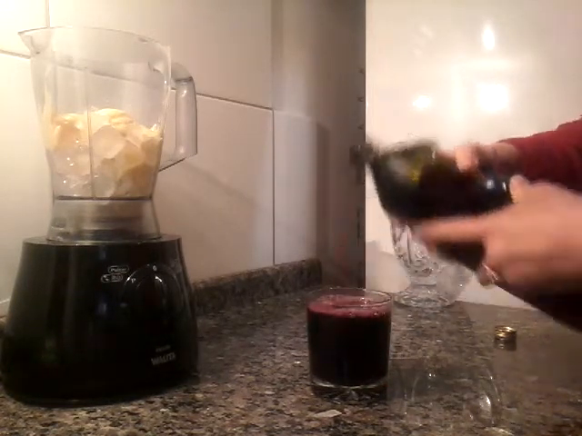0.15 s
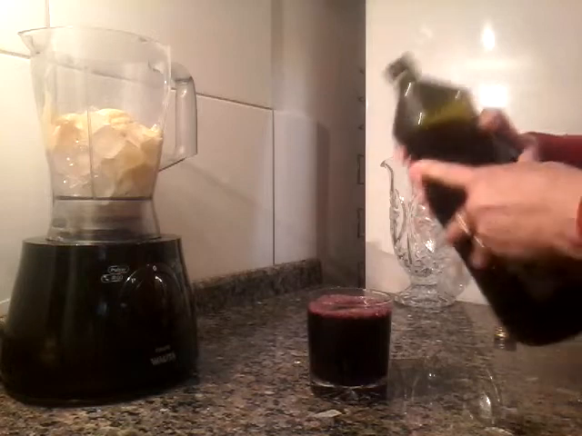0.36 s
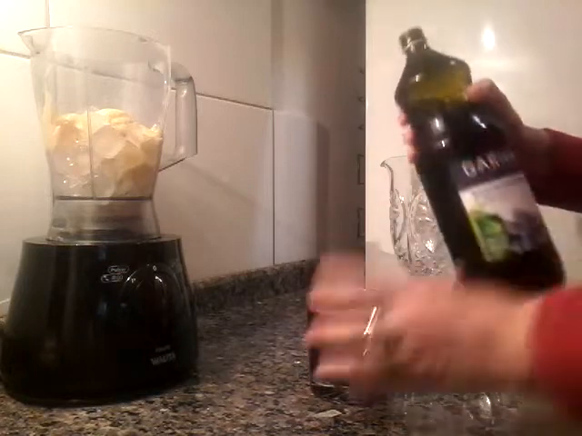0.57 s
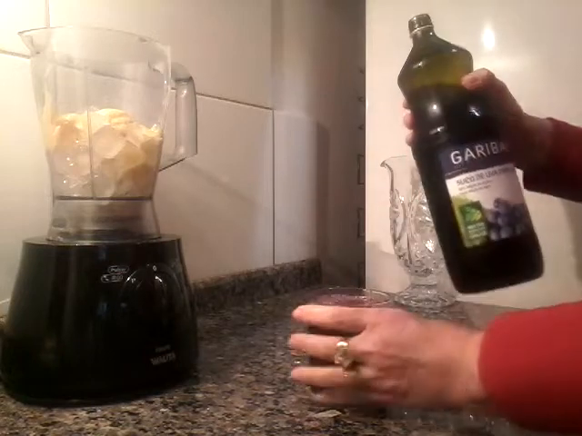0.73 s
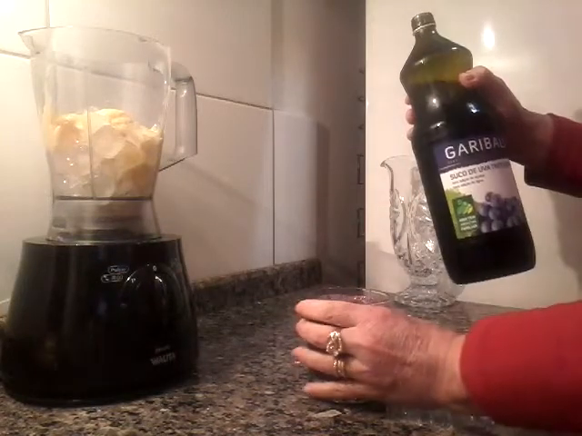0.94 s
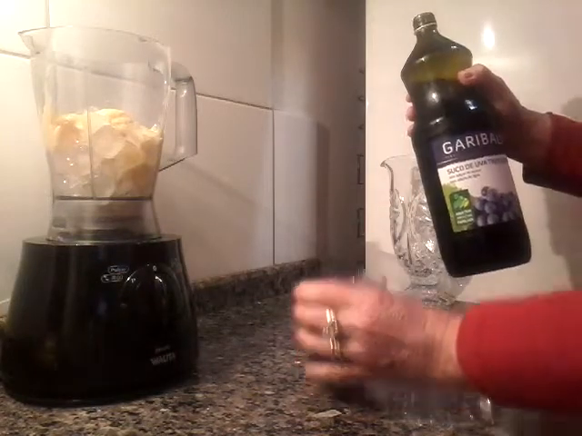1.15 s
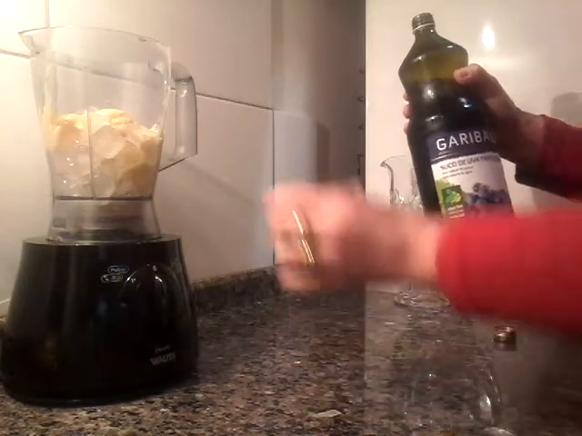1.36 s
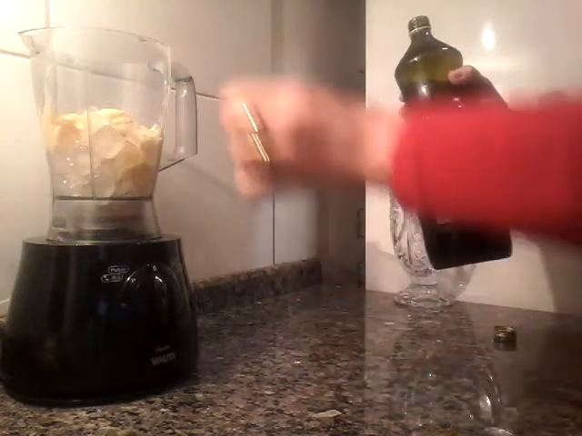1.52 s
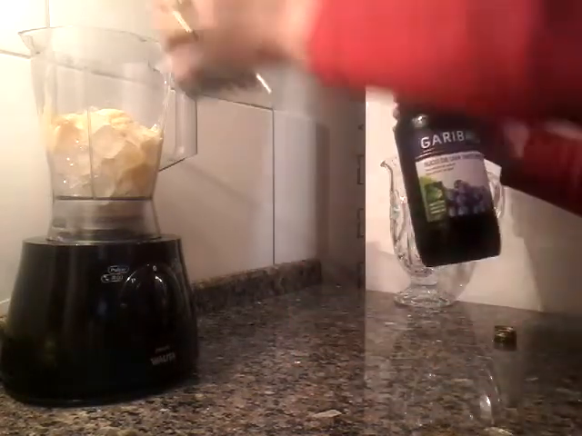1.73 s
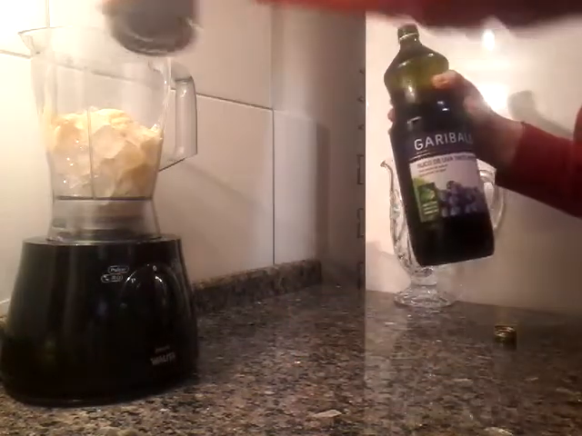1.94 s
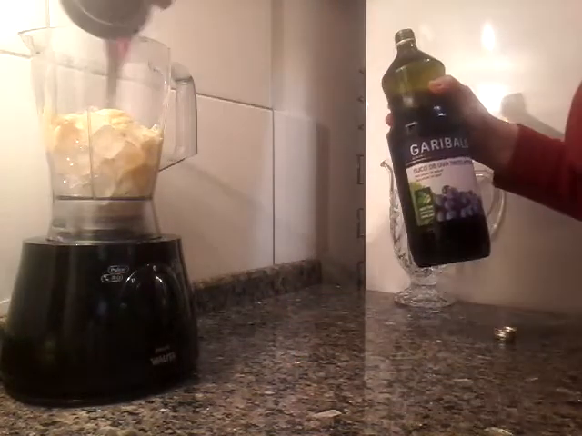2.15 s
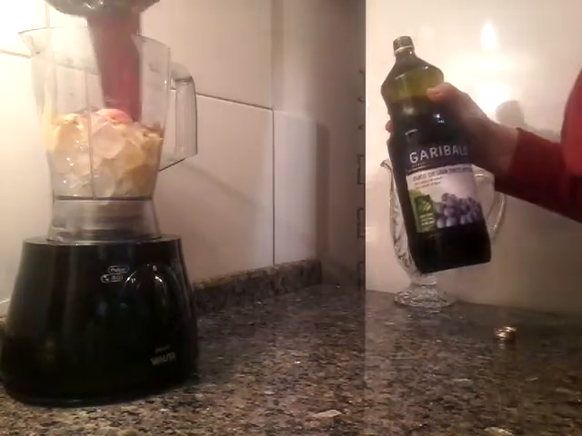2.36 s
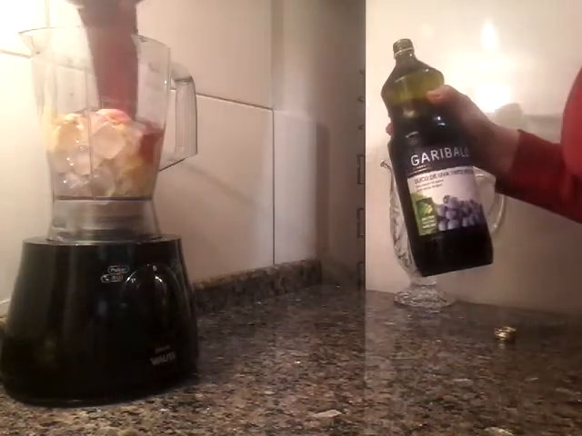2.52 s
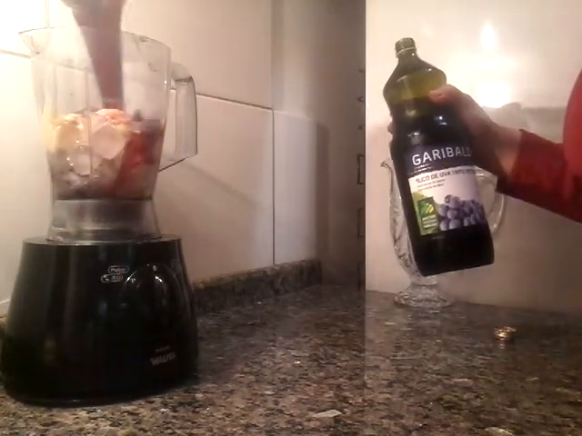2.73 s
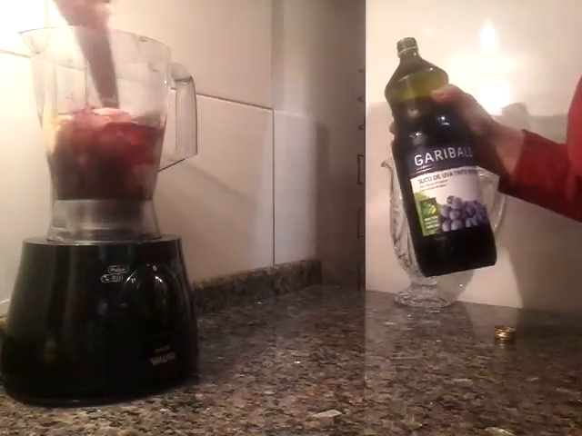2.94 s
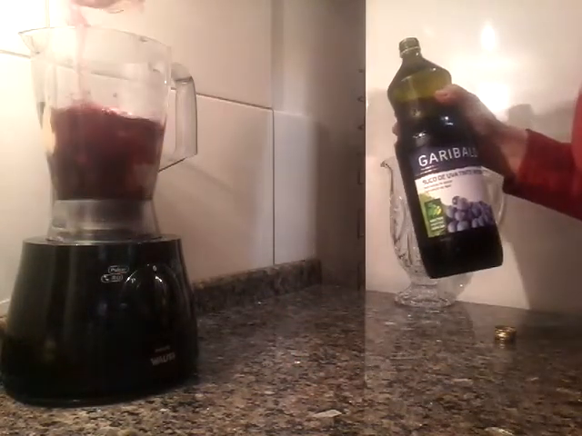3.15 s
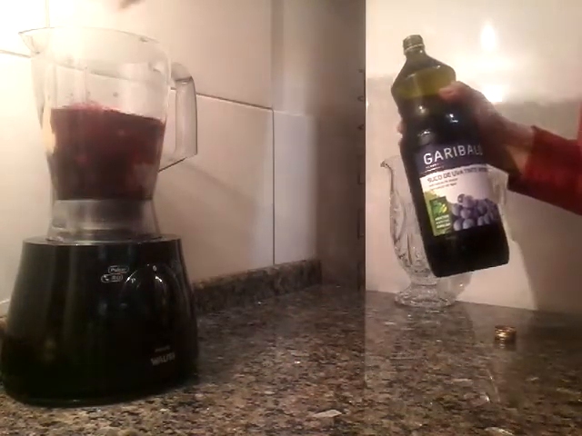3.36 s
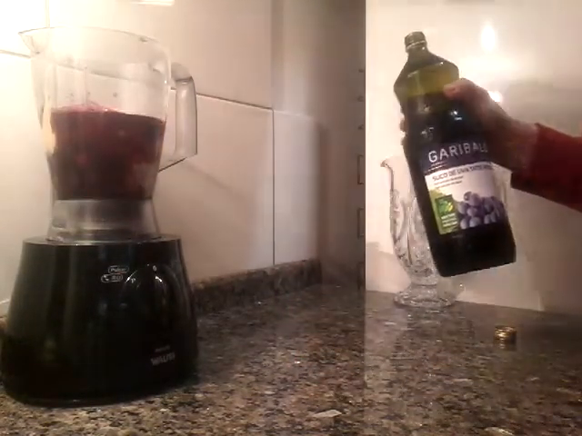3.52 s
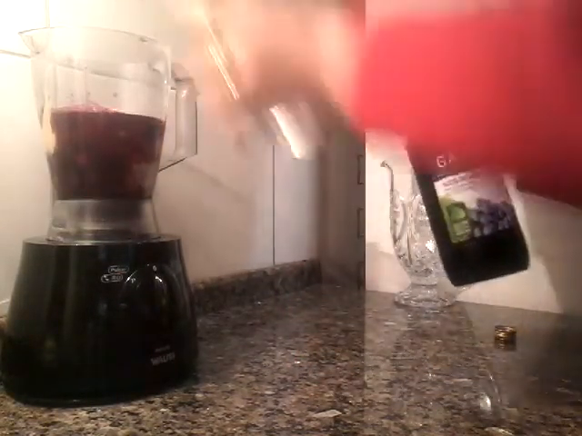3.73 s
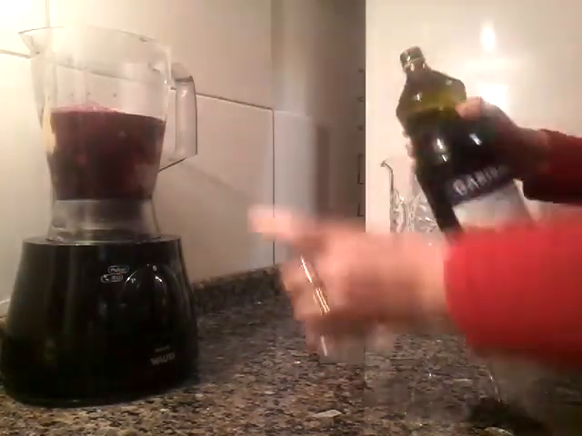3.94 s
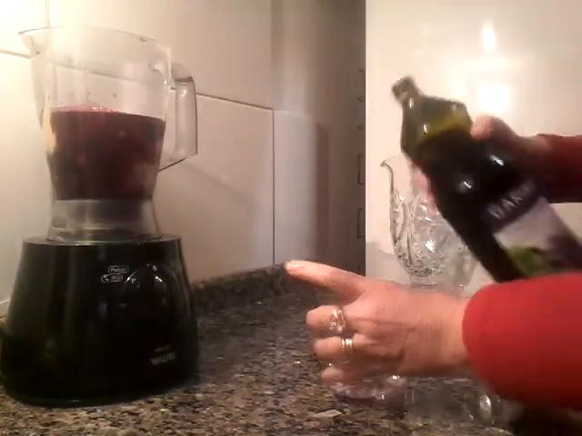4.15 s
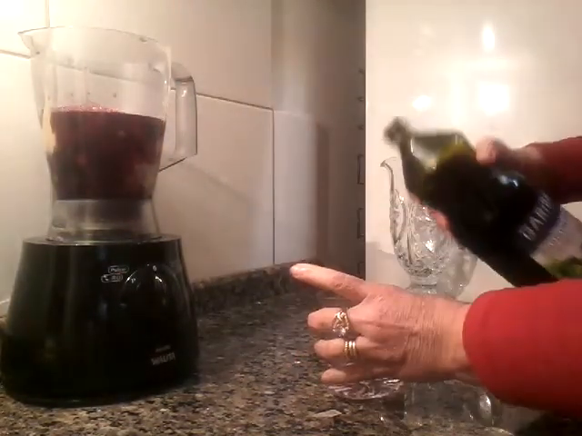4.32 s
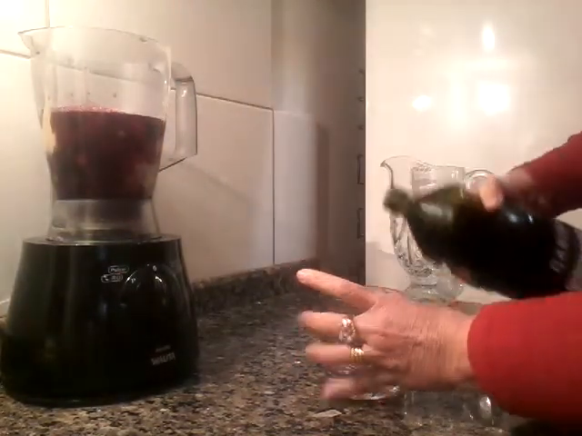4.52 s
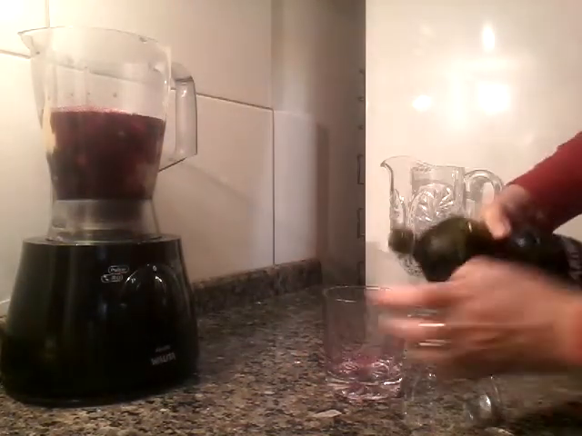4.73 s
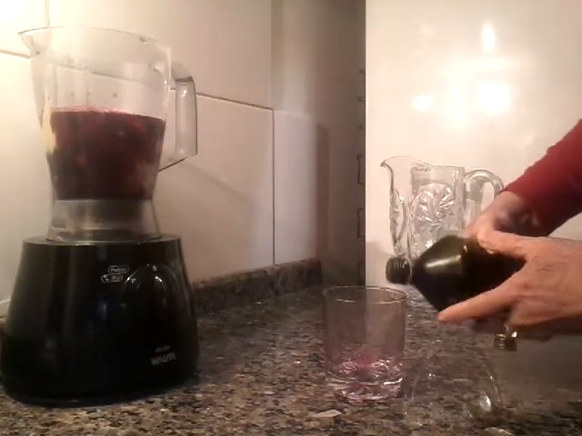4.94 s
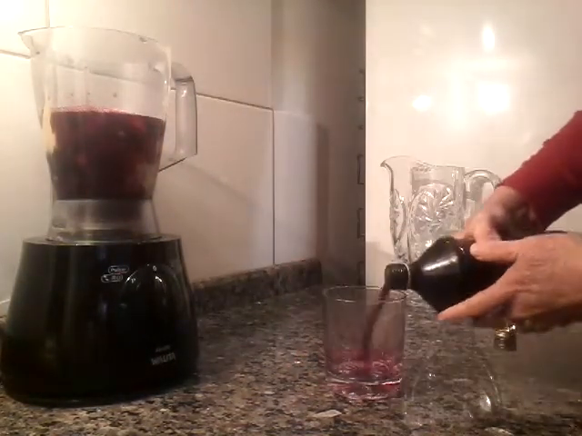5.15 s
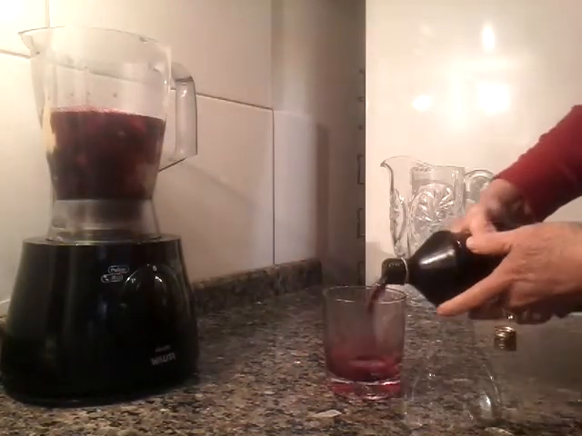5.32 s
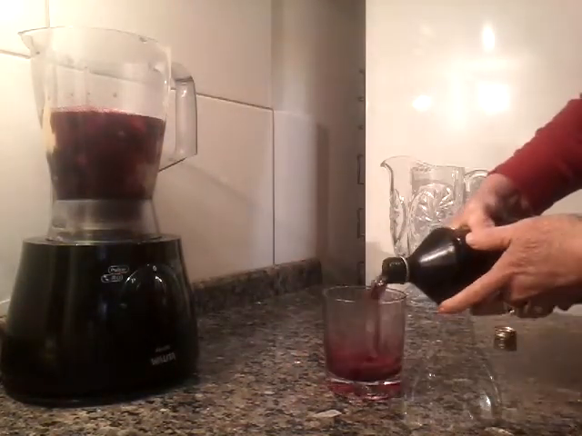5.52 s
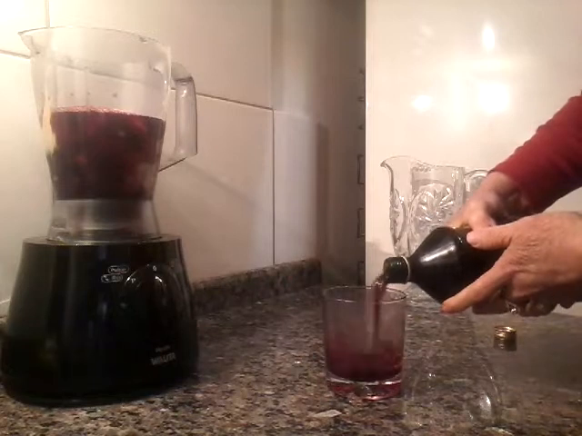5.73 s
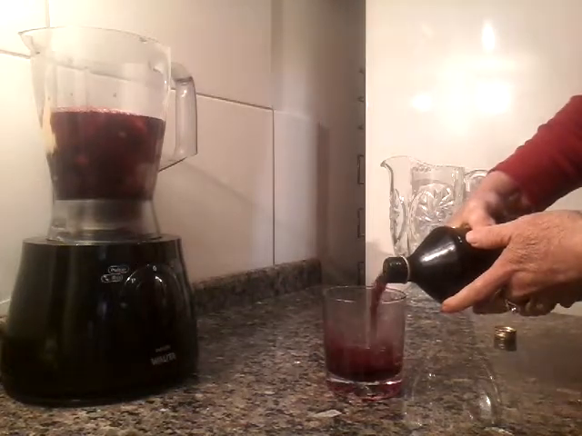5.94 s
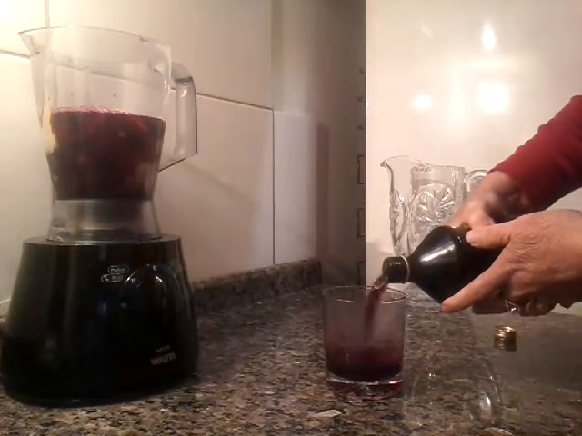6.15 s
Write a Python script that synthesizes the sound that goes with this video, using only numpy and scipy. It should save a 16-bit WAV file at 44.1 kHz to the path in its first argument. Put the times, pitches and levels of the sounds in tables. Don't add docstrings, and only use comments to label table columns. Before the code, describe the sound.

Last drops spatter into a full glass, juice gushes into a blender jar, then the glass knocks on stone and refills in glugs.

```python
import sys
import numpy as np
from scipy import signal
from scipy.fft import rfft, irfft, next_fast_len
from scipy.io import wavfile

SR = 44100
rng = np.random.default_rng(int(sys.argv[2]) if len(sys.argv) > 2 else 0)


def unload_audio(sound):
    columns = np.transpose(np.atleast_2d(sound))
    steps = np.round(np.clip(columns, -1, 1) * 32767)
    wavfile.write(sys.argv[1], SR, steps.astype(np.int16))


def level_to_linear(level):
    exponent = np.asarray(level, float) / 20
    return 10 ** exponent


N = 272538
T = np.arange(N) / SR


def rms_one(x):
    return x / np.sqrt(np.mean(x ** 2) + 1e-20)


def gain_in_time(rows):
    s, db = np.transpose(rows)
    return level_to_linear(np.interp(T, s, db, left=-200, right=-200))


def at_hz(points, hz):
    table_hz, value = np.transpose(points)
    return np.interp(np.log(hz), np.log(table_hz), value)


def drift(rate):
    r = np.exp(-80 * np.pi * rate / SR)
    slow = signal.lfilter([1], [1, -2 * r, r * r], rng.standard_normal(N // 40 + 2002))[2000:]
    return np.interp(np.arange(N) / 40, np.arange(len(slow)), rms_one(slow))


def band(x, low_hz, high_hz):
    edges = [low_hz, min(high_hz, 0.45 * SR)]
    return signal.sosfilt(signal.butter(2, edges, "band", fs=SR, output="sos"), x)


def coloured(x, spectrum):
    hz = np.maximum(np.arange(len(x) // 2 + 1) * SR / len(x), 1)
    return rms_one(irfft(rfft(x) * level_to_linear(at_hz(spectrum, hz)), len(x)))


def add(out, s, sound):
    i = round(s * SR)
    out[i:i + len(sound)] += sound[:N - i]


def burst(hz, octaves, t60):
    t = T[:SR // 8]
    noise = rng.standard_normal(len(t)) * level_to_linear(-60 * t / t60)
    puff = band(noise, hz / 2 ** octaves, hz * 2 ** octaves)
    return puff / np.abs(puff).max()


def liquid(gain, spectrum, per_s, cycles, smooth, patchy_db):
    out, flowing = np.zeros(N), gain > 1e-8
    n = flowing.sum()
    surge = drift(17)[:n]
    sizes = level_to_linear(2.5 * np.minimum(rng.exponential(1, n), 3.5)) * rng.choice([-1, 1], n)
    sizes *= rng.random(n) < per_s * level_to_linear(3.0 * surge) / SR
    pitches = np.geomspace(spectrum[1][0], spectrum[-1][0], 30)
    dealt = rng.integers(0, 30, n)
    grains = 0
    for k, hz in enumerate(pitches):
        r, w = level_to_linear(-60 * hz / (cycles * SR)), 2 * np.pi * hz / SR
        struck = sizes * (dealt == k) + 1e-18
        rung = signal.lfilter([1, 0, -1], [1, -2 * r * np.cos(w), r * r], struck)
        grains = grains + rms_one(rung) * np.sqrt(hz) * level_to_linear(at_hz(spectrum, hz))
    rush = coloured(rng.standard_normal(next_fast_len(n)), spectrum)[:n] * level_to_linear(patchy_db * surge)
    out[flowing] = gain[flowing] * rms_one(rms_one(grains) + smooth * rush)
    return out


# time in seconds, flow level in dB.
JAR_FLOW = [
    (2.18, -81),
    (2.23, -61),
    (2.32, -41.5),
    (2.5, -45.5),
    (2.92, -43),
    (3.12, -50.5),
    (3.22, -65),
    (3.6, -74.5),
]
# time in seconds, trickle level in dB.
TRICKLE = [
    [(0.0, -71), (0.348, -74), (0.6, -87)],
    [(5.25, -69.5), (5.568, -70.5), (6.18, -63)],
]
# time in seconds, fizz level in dB.
FIZZ = [
    [(0.3, -81), (0.712, -76), (2.2, -73)],
    [(3.4, -75), (3.43, -69.5), (5.3, -63.5)],
]
# frequency in Hz, level in dB per Hz.
SPRAY_COLOUR = [(3240, -28), (5500, -7), (6150, -6), (7060, 3), (9190, 2.5), (9740, 0.5), (11900, 1),
                (15200, -2.5), (16000, -23)]
# frequency in Hz, level in dB per Hz.
SPLASH_COLOUR = [(650, -32), (1100, -15), (1280, -20), (1660, 7), (1970, -6.5), (2170, -0.5), (2370, -2),
                 (4170, -5.5), (4610, -2), (7000, -12.5), (9100, -44), (15400, -120)]
# frequency in Hz, level in dB per Hz.
CHURN_COLOUR = [(88, -78), (150, -34), (226, -17), (329, -7), (496, -13), (576, -4), (807, -5), (1400, -13),
                (1820, -42), (3080, -120)]
# frequency in Hz, level in dB per Hz.
THIN_COLOUR = [(710, 2.5), (1200, 13), (1340, -22), (1910, -69), (2230, 15), (4500, -28), (5240, 4),
               (7660, 2.5), (9610, -1), (16000, 3.5)]
SPLASH_DB, SPLASH_FADE_DB_PER_S = 1.5, 3
CHURN_DB, POOL_S, POOL_DB_PER_S = -8.5, 2.48, 60


def streams():
    spray = gain_in_time(JAR_FLOW)
    splash = spray * level_to_linear(SPLASH_DB - SPLASH_FADE_DB_PER_S * (T - JAR_FLOW[0][0]))
    churn = spray * level_to_linear(CHURN_DB + POOL_DB_PER_S * np.minimum(T - POOL_S, 0))
    trickle = sum(gain_in_time(rows) for rows in TRICKLE)
    fizz = sum(gain_in_time(rows) for rows in FIZZ)
    fine = liquid(spray, SPRAY_COLOUR, 2500, cycles=60, smooth=0.55, patchy_db=3.5)
    coarse = liquid(splash, SPLASH_COLOUR, 1500, cycles=45, smooth=0.7, patchy_db=3.5)
    thin = liquid(trickle, THIN_COLOUR, 4000, cycles=50, smooth=1.3, patchy_db=3)
    deep = liquid(churn, CHURN_COLOUR, 350, cycles=22, smooth=0.94, patchy_db=-3)
    foam = fizz * coloured(rng.standard_normal(N), SPRAY_COLOUR) * level_to_linear(2.4 * drift(23))
    mix = level_to_linear(-5.5) * fine + coarse + deep + level_to_linear(2.5) * thin + level_to_linear(-5.5) * foam
    return band(mix, 190, 23000)


# start in seconds, peak in dB, body in dB against the spray.
DRIPS = [(0.0164, -48, 4), (0.0937, -28.5, -10), (0.1181, -20.5, -18), (0.1775, -21.5, -14),
         (0.1854, -42, -10), (0.2314, -41.5, -1), (0.3726, -42, -11), (0.3874, -42.5, -12),
         (0.4653, -35.5, -10.5), (0.5132, -39.5, -24), (0.601, -63, -6), (0.9248, -50.5, -14),
         (1.0051, -46, -12), (3.363, -44.5, -5), (3.4004, -45.5, -5), (3.6443, -48.5, -29),
         (3.9905, -45, 2.5), (4.0195, -46, -9), (4.1167, -43, -4)]
# start in seconds, peak in dB, body in dB against the spray.
JETS = [(2.2183, -37, 2), (2.2313, -25, -33), (2.2942, -16.5, -4.5), (2.3124, -16.5, -9.5),
        (2.349, -17, -2), (2.3954, -20.5, -2.5), (2.4323, -25.5, 1), (2.7516, -33, -1), (2.5595, -31, -6),
        (2.6119, -22.5, -5), (2.6548, -27, -20), (2.6858, -30, -14), (2.8244, -25, -11),
        (2.8928, -26.5, -6), (2.9422, -30, -16), (3.0005, -41, 6), (3.025, -21.5, -38), (3.1228, -26.5, -4)]
# start in seconds, peak in dB, body in dB against the spray.
GLUGS = [(5.52, -51, -20), (5.3963, -43.5, -6.5), (5.4492, -38.5, -1.5), (5.5584, -49, -22),
         (5.5754, -49, -14), (5.6008, -45.5, 0), (5.9055, -37, -4), (5.3, -44, -8.5), (5.6592, -34.5, -23),
         (5.6696, -34, 4), (5.8153, -39.5, -41), (5.8674, -29, -15.5), (5.8727, -27, 0),
         (5.8834, -29.5, -19), (6.0268, -27.5, -8), (6.0802, -29.5, -43), (6.1042, -27.5, -6)]
# start in seconds, peak in dB.
GULPS = [
    (5.3, -57),
    (5.53, -58.5),
    (5.753, -52.5),
    (5.953, -49.5),
    (6.142, -59),
]
DRIP_S, JET_S, GLUG_S = 0.0056, 0.0095, 0.0072
RETURN_DB, RETURN_BODY_DB = 12, -11
SPRAY_HZ, SPRAY_SCATTER = 9380, 0.04


def slaps():
    out, t = np.zeros(N), T[:SR // 12]
    rise = 1 - np.exp(-t / 0.0005)
    returns = [(s, db + RETURN_DB, RETURN_BODY_DB) for s, db in GULPS]
    for rows, length in [(DRIPS, DRIP_S), (JETS, JET_S), (GLUGS + returns, GLUG_S)]:
        for s, peak_db, body_db in rows:
            hz = SPRAY_HZ * np.exp(SPRAY_SCATTER * rng.standard_normal())
            droplets = np.repeat(rng.standard_normal(len(t) // 40 + 1), 40)[:len(t)]
            crackle = level_to_linear(1.86 * droplets)
            noise = rng.standard_normal(len(t)) * crackle * rise * np.exp(-(t / length) ** 2.2)
            spray = band(noise, hz / 1.366, hz * 1.15) + 0.42 * band(noise, 6500, 15000)
            body = band(noise, 2300, 7500)
            add(out, s, level_to_linear(peak_db - 9.5) * spray / np.abs(spray).max())
            add(out, s, level_to_linear(peak_db + body_db - 5.5) * body / np.abs(body).max())
    return out


# start in seconds, peak in dB.
JAR_POPS = [
    (2.3321, -39),
    (2.3684, -28.5),
    (2.4061, -30.5),
    (2.465, -36.5),
    (2.61, -35),
    (2.699, -31),
    (2.7563, -29),
    (2.873, -36),
    (3.047, -37.5),
]
# start in seconds, peak in dB, pitch in Hz.
POCKETS = [(2.328, -51, 470), (2.462, -50, 430), (2.533, -44, 450), (2.595, -40.5, 395), (2.66, -48.5, 286),
           (2.72, -47.5, 267), (2.69, -39, 616), (2.768, -28, 603), (2.922, -43, 635), (3.064, -62, 710),
           (3.373, -57.5, 1200), (2.375, -47.5, 470), (3.048, -49, 980), (2.9, -39, 1030), (3.0, -49, 1070),
           (3.153, -53, 1410), (2.3346, -25.5, 3300), (2.7926, -32, 2150), (3.0999, -32.5, 3320)]
# start in seconds, peak in dB, pitch in
# Hz.
BRIM = [
    (0.095, -50.5, 1400),
    (0.372, -63, 1500),
    (0.19, -50, 1100),
    (0.211, -44, 1090),
    (0.1191, -54, 2920),
    (0.1825, -43, 2280),
    (0.17, -50.5, 1660),
    (0.1176, -47, 5970),
    (3.7738, -59.5, 4580),
]
# start in seconds, peak in dB, pitch in Hz.
REFILL = [(5.372, -59, 1420), (5.476, -57, 1343), (5.657, -37, 1310), (5.908, -42.5, 926),
          (5.933, -39, 886), (5.968, -49.5, 1605), (6.1, -28, 1206), (6.12, -32, 1103), (6.144, -37.5, 953),
          (6.092, -45, 870), (5.965, -52, 880), (5.6417, -51, 2190), (5.67, -39, 2650),
          (5.8753, -32.5, 2865), (6.0246, -50, 2800), (6.0596, -52, 2790), (6.0918, -41, 2910),
          (6.105, -36.5, 2830), (5.186, -51.5, 5650), (5.6, -56, 6400), (5.3991, -57, 6500),
          (5.4318, -52, 6060), (5.4478, -40.5, 4310), (5.6487, -45, 4560), (5.6561, -43, 6240),
          (5.695, -42, 6100), (5.7104, -50, 3940), (6.098, -40, 4780)]
JAR_HZ, JAR_CLIMB_HZ_PER_S = 1566, 220
TICK_HZ, TICK_DB = 4630, 5.5
NECK_HZ, NECK_T60_S = 349, 0.058
BUBBLE_T60_S, SIZE_LAW, VIOLENCE_LAW, MIDDLING_DB = 0.057, 0.55, 0.28, -43


def trapped():
    jar = [(s, db, JAR_HZ + JAR_CLIMB_HZ_PER_S * (s - JAR_FLOW[0][0])) for s, db in JAR_POPS]
    ticks = [(s, db + TICK_DB, TICK_HZ) for s, db in GULPS]
    necks = [(s, db, NECK_HZ, NECK_T60_S) for s, db in GULPS]
    ringing = []
    for s, db, hz in jar + POCKETS + BRIM + REFILL + ticks:
        t60 = BUBBLE_T60_S * (1000 / hz) ** SIZE_LAW * level_to_linear(VIOLENCE_LAW * (MIDDLING_DB - db))
        ringing.append((s, db, hz, t60))
    return ringing + necks


def bubbles():
    out, t = np.zeros(N), T[:SR // 8]
    for s, peak_db, hz, t60 in trapped():
        add(out, s, level_to_linear(peak_db - 9.5) * burst(hz, 0.46, t60))
        swell = 1 - np.exp(-t * hz / 0.46)
        neighbours = zip(rng.uniform(0.002037, 0.02, 2), rng.normal(0, 0.096, 2), (5, 8))
        for late, detune, below_db in [(0, 0, 0), *neighbours]:
            climb = (0.975 + detune) * t + 0.065 * t ** 2 / t60
            level = level_to_linear(peak_db + 0.5 - below_db - 60 * t / t60)
            add(out, s + late, level * swell * np.sin(2 * np.pi * hz * climb))
    return out


# frequency in Hz, t60 in seconds.
KITCHEN_T60 = [(100, .5), (260, 0.6), (700, 0.53), (1840, 0.48), (4850, 0.44), (12000, 0.1)]


def dying(noise, share):
    t = T[:len(noise)] / share
    out = 0
    for hz in 60 * 2 ** np.arange(0, 8.5, 0.5):
        out = out + band(noise, hz / 2 ** 0.25, hz * 2 ** 0.25) * level_to_linear(-60 * t / at_hz(KITCHEN_T60, hz))
    return out


# start in seconds, peak in dB, ring in dB, clatter in dB,
# clatter decay as a share of the room's.
KNOCKS = [
    (4.248, -8.5, -8.5, -9, 0.91),
    (4.52, -18.5, -12, -7.5, 0.93),
    (5.073, -16.5, -9.5, -9.5, 0.98),
]
MODE_HZ = [118, 250, 465, 664, 687, 783, 886, 1004, 1132, 1205, 1250, 1305, 1378, 1530, 1992, 2098, 2177,
           2217, 2250, 2403, 2820, 2934, 3010, 3285, 3345, 3720, 4280, 4926, 5792, 6202]
# t60 in seconds, level in dB in the first, second and third knock.
MODE_RINGS = [(0.47, -25, -22, -19), (0.28, -17, -9, -5.5), (.35, -18, -42, -12.5), (0.39, -26, -35, -28),
              (0.19, -21.5, -45, -7), (0.46, -16, -21, -16), (0.32, -14.5, -2.5, -10),
              (0.21, -6, -23, -3.5), (0.34, -8, -12, -21), (0.091, -3.5, -24, -36), (0.08, -15.5, -18, -29),
              (0.26, -26, -33, -16), (0.21, -17.5, -19, -28), (0.14, -16.5, -9, -13),
              (0.11, -22.5, -31, -36), (0.46, -16, -11, -32), (0.13, 5.5, 5.5, -3), (0.38, -10, -5.5, -7),
              (0.23, -16, -8, -4), (0.33, -17, -22, -21), (0.314, -28.5, -33, -20), (0.32, -23, -18, -5),
              (0.3, -17, -9.5, -12), (0.18, -30.5, -19, -7), (0.44, -26, -33, -17), (0.33, -20.5, -36, -15),
              (0.37, -30, -41, -21.5), (0.42, -52, -31, -25), (0.13, -39.5, -41, -18),
              (0.23, -40.5, -45, -20)]
# frequency in Hz, t60 in seconds,
# level in dB in the first, second and third knock.
RIM_MODES = [(9012, .12, -60, -60, -28), (9835, .1, -55, -55, -28), (10770, .07, -34, -36, -30),
             (11990, .14, -31, -33, -46), (14380, .09, -27, -60, -50)]
# frequency in Hz, level in dB per Hz.
CLATTER = [
    [(90, -49), (250, -15.5), (900, -7.5), (2500, -7.5), (5000, -28), (8000, -46), (15500, -52)],
    [(90, -21), (250, -23.5), (900, -8), (2500, -9), (5000, -26.5), (8000, -47.5), (15500, -35)],
    [(90, -42), (250, 6), (900, 11), (2500, -0.5), (5000, -12), (8000, -18), (15500, -30)],
]
TWIN_SPLIT, TWIN_DB = 0.007, -6


def knocks():
    out, t = np.zeros(N), T[:SR * 3 // 5]
    modes = np.vstack([np.column_stack([MODE_HZ, MODE_RINGS]), RIM_MODES])
    hz, t60, *struck_db = modes.T[:, :, None]
    for knock, mode_db, colour in zip(KNOCKS, struck_db, CLATTER):
        s, peak_db, ring_db, clatter_db, share = knock
        twin_hz = hz * (1 + TWIN_SPLIT * rng.uniform(-1.1, 1, hz.shape))
        main = np.sin(2 * np.pi * hz * t + rng.uniform(0, 3.86, hz.shape))
        twin = level_to_linear(TWIN_DB) * np.sin(2 * np.pi * twin_hz * t)
        tones = (main + twin) * level_to_linear(mode_db - 60 * t / t60)
        add(out, s, level_to_linear(peak_db + ring_db) * tones.sum(axis=0) * (1 - np.exp(-t / 0.001)))
        clatter = dying(coloured(rng.standard_normal(len(t)), colour), min(share, 7 / 8))
        clatter = clatter * (1 + 3.45 * np.exp(-t / 0.011))
        add(out, s, level_to_linear(peak_db + clatter_db) * clatter * (1 - np.exp(-t / 0.0012)))
    return band(band(out, 90, 19000), 70, 19000)


# start in seconds, peak in dB, centre in Hz, t60 in seconds.
TOUCHES = [(0.001, -49, 960, 0.13), (1.06, -51, 4670, 0.043), (0.181, -44.5, 1580, 0.16),
           (0.984, -46.5, 846, 0.042), (1.012, -52, 11000, 0.2), (0.601, -52, 5870, 0.012),
           (3.298, -49, 690, 0.031), (1.019, -74, 1090, 0.05), (1.388, -52.5, 1350, 0.037),
           (3.431, -49.5, 1690, 0.045), (3.468, -48, 1500, 0.074), (3.62, -58, 2660, 0.11),
           (3.883, -55, 1873, 0.029), (3.991, -38.5, 1990, 0.045), (4.066, -46.5, 2640, 0.026),
           (4.082, -40, 1780, 0.046), (4.116, -50, 1870, 0.044)]


def touches():
    out = np.zeros(N)
    thuds = [(s, db + 2.0, 600, 0.012) for s, db in GULPS]
    for s, peak_db, hz, t60 in TOUCHES + thuds:
        add(out, s, level_to_linear(peak_db) * burst(hz, 0.66, t60))
    return out


def kitchen(x):
    t = T[:SR // 2]
    echo = dying(rng.standard_normal(len(t)), 0.66)
    echo = echo * (1 - np.exp(-(t / 0.0015) ** 2))
    return signal.fftconvolve(x, echo / np.sqrt(np.sum(echo ** 2)))[:N]


# frequency in Hz, rms level in dB.
HUM = [(118.4, -77), (183.0, -89.5), (274.5, -92), (355.3, -78.5), (543.7, -82.5), (716.0, -88)]
# frequency in Hz, level in dB per Hz.
AIR_COLOUR = [(20, -24.5), (60, -13), (90, -15.5), (150, -15), (350, -12), (600, -15.5), (1100, -16),
              (2700, -21), (5500, -24), (9000, -34), (13000, -34.5), (16200, -25.5)]
AIR_DB = -69


def background():
    hum = np.zeros(N)
    for hz, db in HUM:
        level = level_to_linear(db + 2.5 + 2.8 * drift(3.0))
        hum += level * np.sin(2 * np.pi * hz * T + 0.75 * drift(1.7))
    air = coloured(rng.standard_normal(N), AIR_COLOUR)
    return hum + level_to_linear(AIR_DB + 0.5 * drift(5.9)) * air


def scene():
    rush, drops, pops, blows, hands = streams(), slaps(), bubbles(), knocks(), touches()
    wet = level_to_linear(-1) * drops + level_to_linear(-4.5) * hands + level_to_linear(-10) * rush + level_to_linear(-8) * pops
    return (blows + drops + pops + hands + rush + kitchen(wet) + background())[None]


def top_cut(x):
    return signal.sosfilt(signal.butter(12, 16460, fs=SR, output="sos"), x)


PORT_HZ, PORT_WIDTH_HZ, PORT_DB = 9713, 877, 14
CUTOFF_HZ, OFFSET = 16400, -0.0005


def record(dry):
    r, w = np.exp(-np.pi * PORT_WIDTH_HZ / SR), 2 * np.pi * PORT_HZ / SR
    peak = np.array([1, 0, -1]) * (1 - r * r) / 2
    port = signal.lfilter(peak, [1, -2 * r * np.cos(w), r * r], dry)
    low_pass = signal.cheby2(12, 60, CUTOFF_HZ, fs=SR, output="sos")
    mix = signal.sosfilt(low_pass, dry + level_to_linear(PORT_DB) * port) + OFFSET
    return top_cut(mix)


dry = scene()
out = record(dry)
unload_audio(out)
```